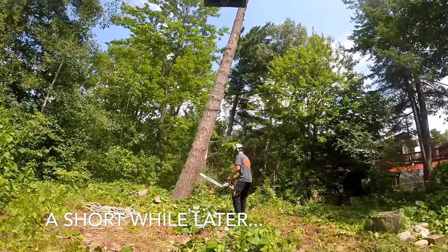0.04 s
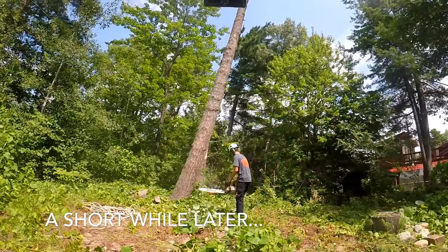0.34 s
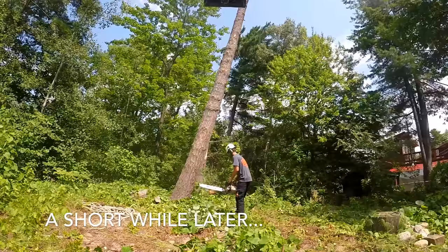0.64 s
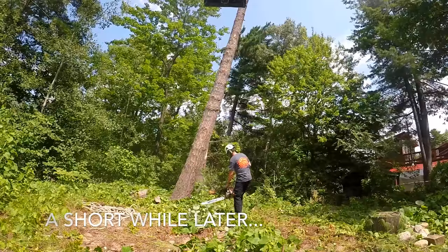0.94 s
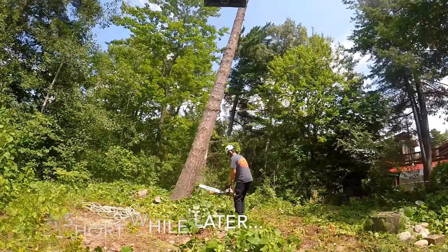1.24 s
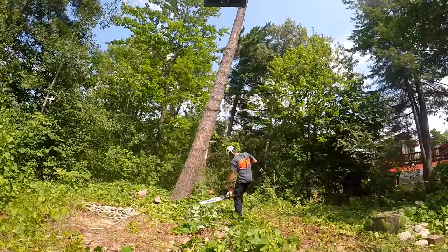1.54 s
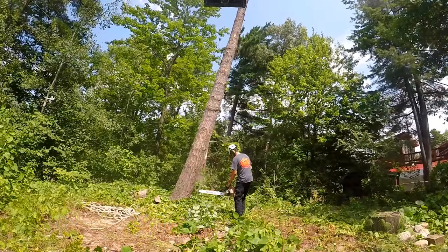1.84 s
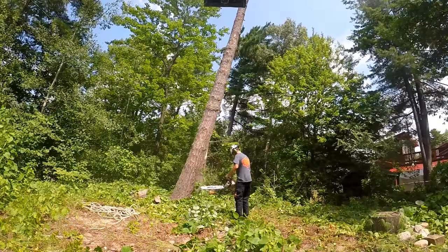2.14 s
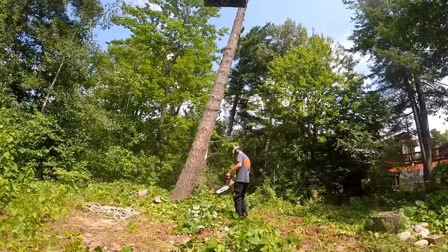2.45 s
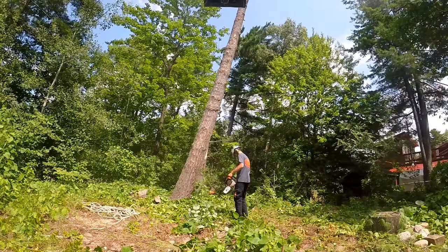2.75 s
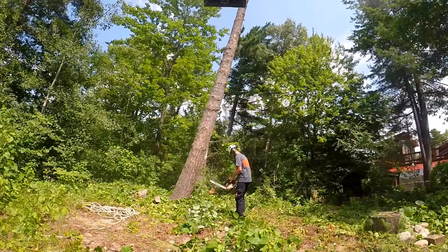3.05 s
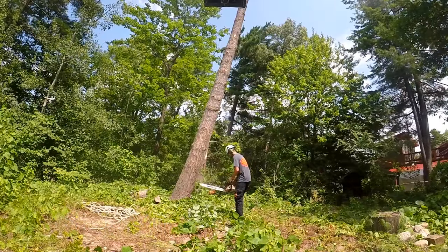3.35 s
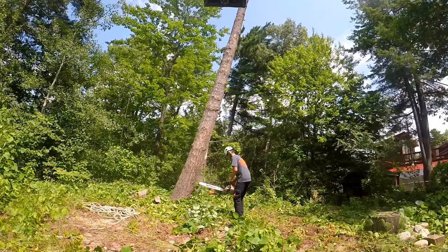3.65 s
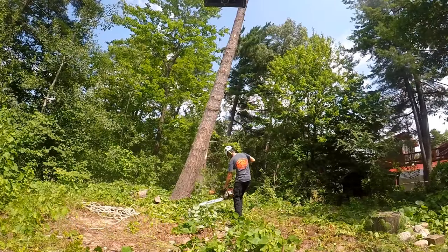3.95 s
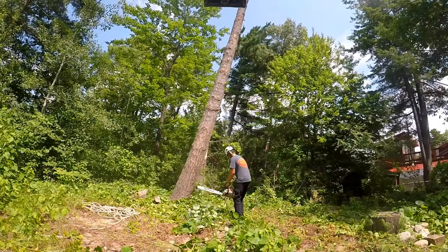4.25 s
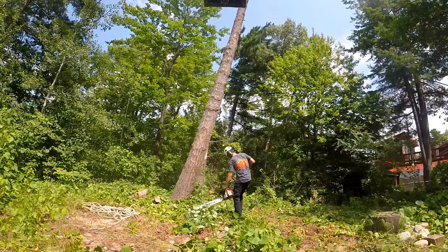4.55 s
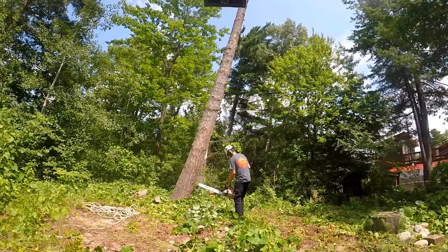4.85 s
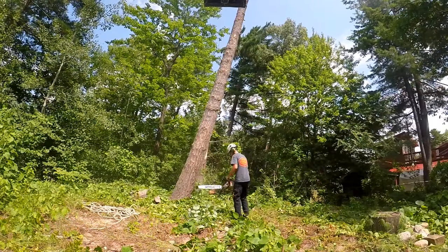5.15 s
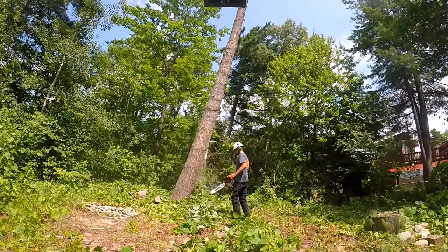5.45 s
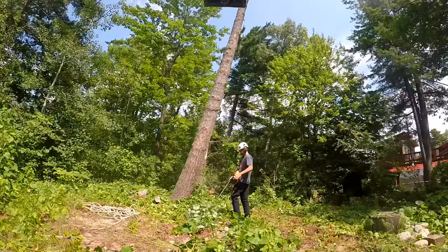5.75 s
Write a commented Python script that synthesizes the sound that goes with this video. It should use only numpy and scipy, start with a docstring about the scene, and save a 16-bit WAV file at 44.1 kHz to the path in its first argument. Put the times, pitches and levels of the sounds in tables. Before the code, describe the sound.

Several rattling pulls on a chainsaw's starter rope before the two-stroke engine catches, sputters and idles unevenly.

```python
"""Pull-starting a chainsaw

A two-stroke saw gets a faint first turn-over, then three pulls that coast to a stop; a last tug catches.
The starter clacks and ticks, the casing rattles and rings, and every turn of the crank puffs through
the muffler. After a few coughs the rich idle fires on about every third turn. Two closely spaced
microphone ports hear it over a quiet outdoor hush with a faint insect trill."""
import sys
import numpy as np
from scipy.fft import rfft, irfft, next_fast_len
from scipy.io import wavfile
from scipy.ndimage import uniform_filter1d

SR = 44100
rng = np.random.default_rng(int(sys.argv[2]) if len(sys.argv) > 2 else 0)


def unload_audio(sound):
    """Save the sound as a 16-bit wav file, at the path given as the first command line argument."""
    columns = np.transpose(np.atleast_2d(sound))
    # keep every value between -1 and 1, then stretch to whole-number steps
    steps = np.round(np.clip(columns, -1, 1) * 32767)
    wavfile.write(sys.argv[1], SR, steps.astype(np.int16))


N = 264600
TIME = np.arange(N) / SR
FFT_SIZE = next_fast_len(N + SR // 2, True)
FREQS = np.maximum(np.fft.rfftfreq(FFT_SIZE, 1 / SR), 1)


def from_db(db):
    """Decibels to gain."""
    return 10 ** (np.asarray(db) / 20)


def rms_one(x):
    """Scale to unit power."""
    return x / np.sqrt(np.mean(np.abs(x) ** 2) + 1e-20)


def over_hz(points):
    """Join (Hz, value) points on a log-frequency axis."""
    hz, value = np.transpose(points)
    return np.interp(np.log(FREQS), np.log(np.sort(hz)), value)


def resonances(modes, plain_db):
    """Gain of a body: resonant peaks standing on a plain, unresonant share."""
    peaks = sum(from_db(db) ** 2 / (1 + ((FREQS - hz) / (width / 2)) ** 2) for hz, width, db in modes)
    return np.sqrt(peaks + from_db(plain_db) ** 2)


def through(x, response):
    """Apply a frequency response."""
    return irfft(rfft(x, FFT_SIZE) * response, FFT_SIZE)[..., :N]


def colour(x, eq, body=1):
    """Minimum-phase EQ of unit power gain: it rings only after it is struck."""
    gain = rms_one(from_db(over_hz(eq)) * body)
    cepstrum = irfft(np.log(gain + 1e-6), FFT_SIZE)
    cepstrum[1:FFT_SIZE // 2] *= 2
    cepstrum[FFT_SIZE // 2 + 1:] = 0
    return through(x, np.exp(rfft(cepstrum)))


def puffs(times, levels_db, puff_s=.015):
    """Pressure impulses, each with the energy of its level held for one puff length."""
    out = np.zeros(N)
    inside = (times >= 0) & (times < (N - 1) / SR)
    out[(times[inside] * SR).astype(int)] = (from_db(levels_db) * np.sqrt(puff_s * SR))[inside]
    return out


def bursts(times, levels_db, rise_ms):
    """Noise bursts that swell, then die a few times slower; a direct row and a scattered row."""
    power, age_ms = np.zeros(N), np.arange(SR // 10) / SR * 1000
    for s, db, rise in zip(times, levels_db, np.broadcast_to(rise_ms, len(times))):
        start = int(np.clip(s * SR, 0, N))
        rises = age_ms / max(rise, .3)
        envelope = from_db(db) * rises * np.exp(1 - rises)
        power[start:start + len(envelope)] += envelope[:N - start] ** 2
    return np.sqrt(power) * rng.standard_normal((2, N))


def uneven(times, spread):
    """A chance offset for every event."""
    return spread * rng.standard_normal(len(times))


# Tone of the outdoor bed. Each row: frequency in Hz, relative level in dB.
HUSH_EQ = [(76, -55), (130, -4.5), (153, -1.5), (206, -6), (242, -7), (383, -13.5), (571, -15.5),
           (619, -17), (1820, -21), (2360, -23), (3820, -24), (4480, -21), (10200, -28.5), (13700, -45.5),
           (15500, -40)]
# Stereo width of the bed. Each row: frequency in Hz, side over mid in dB.
HUSH_WIDTH = [(60, -4), (110, -1), (200, -1.5), (380, 4.5), (700, 9), (1290, 6.5), (2380, 0.5), (4400, -8),
              (8120, 4), (15000, -4)]


def outdoors(hush_db=-50.5, trill_db=-60.5, trill_hz=3775, low_cut_hz=144.7, rumble_db=-80.5):
    """An even hush with only a trace of deep rumble, and a thin insect trill."""
    low_cut = 1 / np.sqrt(1 + (low_cut_hz / FREQS) ** 20)
    hush = from_db(hush_db) * rms_one(from_db(over_hz(HUSH_EQ)) * low_cut)
    trill = from_db(trill_db) * rms_one(1 / (1 + ((FREQS - trill_hz) / 170) ** 2))
    rumble = from_db(rumble_db) * rms_one(1 / (1 + (FREQS / low_cut_hz) ** 2))
    mid, side = through(rng.standard_normal((2, N)), np.sqrt(hush ** 2 + trill ** 2 + rumble ** 2))
    side = through(side, from_db(over_hz(HUSH_WIDTH)))
    return np.array([mid + side, mid - side])


def pull_turns(pull):
    """The rope drives the first turns, then the crank coasts down; returns times and turns/s."""
    start, turns, driven, first, let_go, loss = pull[:6]
    turn = np.arange(turns)
    coasting = (1 - loss) ** np.maximum(turn - driven, 0)
    speed = np.interp(turn, [0, driven], [first, let_go]) * coasting
    return start + np.cumsum(1 / speed) - 1 / speed, speed


def grip_db(pull, t, rope_lead_s=.017):
    """A pull builds in strength as the rope tightens, from just before the first puff."""
    start, take_up_s, level_db = pull[0], pull[6], pull[7]
    return level_db + 20 * np.log10(np.clip((t - start + rope_lead_s) / take_up_s, 1e-6, 1))


# Pulls on the rope. Each row: start in seconds, turns in all, turns driven by the rope, first and
# let-go speeds in turns/s, share of speed lost per coasting turn, take-up in seconds, trim in dB.
PULLS = [(.002, 2, 1, 16, 14, .2, 0.023, -12), (.956, 3, 1, 20.9, 18.3, 0.28, 0.0042, 2.5),
         (1.518, 21, 14, 42, 25, .18, 0.073, 0), (3.832, 12, 4, 38.69, 31.61, .167, 0.11, 0.5),
         (4.495, 4, 3, 27.8, 29.6, 0.023, 0.018, 0.5)]
# EQs for the air thump, the unfired muffler and the rattle. Each row: frequency in Hz, gain in dB.
PUFF_EQ = [(60, -66.5), (105, -37), (125, -13.5), (145, -5.5), (180, 0), (222, 5), (260, -5.5), (320, -4.5),
           (400, -5.5), (600, -28.5), (1200, -63)]
MUFFLER_EQ = [(250, -22.5), (400, 14.5), (540, -24), (600, -7), (650, 11.5), (760, 6.5), (860, -15),
              (1000, -4), (1200, -1), (1310, -10), (1450, -1), (1800, -27), (3000, -29)]
RATTLE_EQ = [(290, -58.5), (500, -0.5), (657, -4.5), (968, -1.5), (1180, -2.5), (1310, -33.5), (1850, -6.5),
             (3330, -6.5), (3580, -7.5), (4020, -6), (6180, -2.5), (6830, -1), (8120, -11), (12700, -26),
             (15500, -33)]
# Ring of the casing. Each row: frequency in Hz, width in Hz, peak gain in dB.
CASING_MODES = [(724, 56, -4), (1195, 11, -2), (1457, 45, 13.5), (1823, 110, 1), (2340, 210, -3),
                (2801, 78, 0.5), (3127, 93, -3.5), (3560, 76, 1), (5050, 85, -7.5), (6680, 52, -4.5),
                (7200, 31, -2.5), (8600, 100, -26)]


def cranking(puff_db=-30, intake_db=-8.5, muffler_db=-35.5, rattle_db=-29, rebound_db=-33):
    """Each unfired turn puffs, gulps air and shakes the casing; the slowest clink against compression."""
    brisk_speed, rebound_speed = 22.66, 13  # turns/s
    rows = []
    for pull in PULLS:
        times, speeds = pull_turns(pull)
        rows.append([times, speeds, grip_db(pull, times)])
    s, speed, grip = np.hstack(rows)
    s = s + (speed > brisk_speed) * uneven(s, .0022)
    force = -13.5 * np.maximum(np.log2(brisk_speed / speed), 0)  # dB, lower with each halving of speed
    puff = force + grip / 2 + uneven(s, .3)
    rattle = force + grip + uneven(s, 2)
    intake_s = s + np.minimum(.42 / speed, .0135)

    def ports_open(db):
        """The exhaust impulse, then the weaker intake impulse."""
        return puffs(s, db) + puffs(intake_s, db + intake_db + uneven(s, 4))

    thump = colour(ports_open(puff + puff_db), PUFF_EQ)
    ring = colour(ports_open((puff + rattle) / 2 + muffler_db), MUFFLER_EQ)
    jolts = bursts(s - .0052, rattle + rattle_db, rise_ms=8.7)
    shake = colour(jolts, RATTLE_EQ, resonances(CASING_MODES, plain_db=-18))
    slow_s = s[speed < rebound_speed]
    rebounds = bursts(slow_s - .00855, rebound_db + uneven(slow_s, .5), rise_ms=3.4)
    rebound_eq = [(120, -70), (400, -6), (900, 4.5), (1400, -20), (2000, 3), (2800, 7.5), (3600, -13),
                  (7000, -12), (12000, -35)]
    clink = colour(rebounds, rebound_eq, resonances(CASING_MODES, plain_db=-8))
    return thump + ring + shake + clink


def pull_motion(level_db=-26, at_turns_per_s=34.6, db_per_doubling=18.5):
    """Envelope of the rubbing during the pulls: it follows the speed of the crank."""
    level = np.zeros(N)
    for pull in PULLS:
        s, speed = pull_turns(pull)
        doublings = np.log2(np.interp(TIME, s, speed) / at_turns_per_s)
        turning = TIME < s[-1] + 1 / speed[-1]
        level += from_db(level_db + db_per_doubling * doublings + grip_db(pull, TIME)) * turning
    return level


def chatter(spread_db, hold_ms):
    """Gain that jumps about every few milliseconds; unit power."""
    wander = rms_one(uniform_filter1d(rng.standard_normal(N), size=int(hold_ms * SR / 1000)))
    return rms_one(from_db(spread_db * np.clip(wander, -2, 2)))


def whirr(catch_db=-27, flare_db=-24, idle_db=-30):
    """Rope, flywheel and chain rub and ring the casing; this flares as the engine catches, then eases."""
    engine_db = np.interp(TIME - CATCH_S, [0, .23, 1.21], [catch_db, flare_db, idle_db])
    level = pull_motion() + RUNNING * from_db(engine_db)
    rubbing = level * chatter(spread_db=4, hold_ms=4) * rng.standard_normal((2, N))
    return colour(rubbing, RATTLE_EQ, resonances(CASING_MODES, plain_db=-14.5))


def ratchet(ticks_per_s=80):
    """The starter pawls and the chain tick at random while the pulls spin the crank."""
    at = np.nonzero(rng.random(N) < ticks_per_s / SR)[0]
    db = 20 * np.log10(pull_motion() + 1e-9) + rng.uniform(-4, 4, N)
    tick_eq = [(200, -55), (900, -27), (2000, -1.5), (4000, 0), (7200, -1), (8500, -11), (14000, -26)]
    return colour(bursts(at / SR, db[at], rise_ms=.99), tick_eq)


def housing_ring(pull_db=-11, catch_db=-33, idle_db=-47, ring_hz=1195.4, half_width_hz=12):
    """One lightly damped mode sings through the pulls and first coughs, then recedes in the idle."""
    engine_db = np.interp(TIME - CATCH_S, [.44, .82], [catch_db, idle_db])
    level = from_db(pull_db) * pull_motion() + RUNNING * from_db(engine_db)
    mode = rms_one(1 / (1 + ((FREQS - ring_hz) / half_width_hz) ** 2))
    return level * through(rng.standard_normal(N), mode)


# Handling clicks. Each row: start in seconds, level in dB.
CLICKS = [(0.438, -39), (2.782, -40.5)]
# Their crisp tone. Each row: frequency in Hz, gain in dB.
CLICK_EQ = [(200, -55), (1200, -22), (3000, -1.5), (5000, -3), (6800, 5.5), (8500, -6), (12000, -15),
            (15000, -12)]


def handling():
    """Light clicks as the saw is handled between the pulls."""
    s, db = np.transpose(CLICKS)
    return colour(bursts(s, db, rise_ms=6.7), CLICK_EQ)


# Hits of the starter pawls and loose metal. Each row: start in seconds, knock, clink and tick levels
# in dB before each layer's trim, rise of the clink in ms, delay of the knock in ms.
CLACKS = [(0.835, -32, -37, -33, 3, 0), (.846, -13.5, -27, -25, 2.2, -1),
          (1.098, -34.5, -53, -36, 3.4, 11.5), (1.379, -36.5, -32, -46, 3.1, -3),
          (1.419, -20, -30.5, -28.5, 3.2, 4.5), (1.506, -26, -25.5, -28, 1.9, 4.5),
          (1.538, -49, -18.5, -19.5, 2.6, 0), (1.555, -44, -30, -26.5, 3.1, 0),
          (1.573, -33, -21, -22, 2.8, -11), (1.774, -25, -20.5, -17, 2.2, 1),
          (1.925, -16.5, -22, -18.5, 1.85, 0.5), (2.021, -53, -46, -30.5, 1.4, -3),
          (2.112, -26, -28.5, -35.5, 3.8, -3.5), (3.785, -23.5, -19, -30, 3.65, 0.5),
          (4.402, -23, -35.5, -28.5, 3.7, 7.5), (4.98, -12.5, -38, -27, 1.6, 3.5)]
# Three EQs: knock, clink, tick. Each point: frequency in Hz, gain in dB.
CLACK_EQS = [
    [(200, -64), (480, -16), (680, 1), (1000, 6), (1250, -3.5), (1500, -1.5), (2400, -9.5), (5000, -50)],
    [(600, -63), (1300, -20), (1800, -4.5), (2600, 2.5), (3200, -2), (4500, -19), (9000, -87)],
    [(1500, -99), (3200, -8.5), (4500, 5), (6200, 0.5), (7100, 10), (8200, -10.5), (11000, -14),
     (15000, -30)],
]


def clacks(bounce_s=.0377):
    """Metal parts meet: a dry knock as they seat, a casing clink with a faint bounce, a tick on top."""
    s, knock_db, clink_db, tick_db, rise_ms, delay_ms = np.transpose(CLACKS)
    knock_eq, clink_eq, tick_eq = CLACK_EQS
    knock = colour(bursts(s + delay_ms / 1000, knock_db - 4, rise_ms * 1.84), knock_eq)
    strike = bursts(s, clink_db - 1, rise_ms)
    bounce = bursts(s + bounce_s, knock_db - 23, rise_ms)
    clink = colour(strike + bounce, clink_eq, resonances(CASING_MODES, plain_db=-36))
    tick = colour(bursts(s, tick_db + 1.5, rise_ms * 1.64), tick_eq)
    return knock + clink + tick


# Uneven firings as the engine catches and when it stumbles.
# Each row: start in seconds, bang level in dB, most turns until the next firing.
COUGHS = [(4.636, -14.5, 6), (4.759, -14.5, 4), (4.834, -15.5, 4), (4.902, -13.5, 3), (4.951, -13, 3),
          (5.001, -13.5, 3), (5.952, -15.5, 2), (5.979, -15, 3)]
CATCH_S = COUGHS[0][0]
RUNNING = TIME >= CATCH_S
IDLE_TURNS_PER_S, TURNS_PER_FIRING = 62.98, 3
SETTLE_START_S, SETTLE_S = 4.93, .49


def firings(idle_start_s=5.051, idle_count=20, idle_db=-13.5):
    """The coughs and the even, slowly quickening idle; returns times, dB and turns until the next."""
    speed = IDLE_TURNS_PER_S + .284 * np.arange(idle_count)
    gaps = TURNS_PER_FIRING / speed
    even = [(s, idle_db, TURNS_PER_FIRING) for s in idle_start_s + np.cumsum(gaps) - gaps]
    return np.transpose(sorted(even + [tuple(row) for row in COUGHS]))


def settled(t):
    """0 while the engine is catching, 1 once it has settled."""
    return np.clip((t - SETTLE_START_S) / SETTLE_S, 0, 1)


def boom_db_at(t, faded_in_db=-41.5, growth_db_per_s=5.5):
    """The idle's low boom fades in and grows, as if the microphone's low cut lifts."""
    fade_db = 20 * np.log10(settled(t) + 1e-3)
    return faded_in_db + fade_db + growth_db_per_s * (t - SETTLE_START_S - SETTLE_S)


# EQs for the low thud and the crack of a firing. Each row: frequency in Hz, gain in dB.
THUD_EQ = [(15, -8), (45, 2), (66, 3), (95, 5), (130, -4), (200, -1), (400, -49.5)]
CRACK_EQ = [(590, -33), (1000, -9), (1170, 6.5), (1290, -9), (1620, -5), (1940, 4.5), (2710, -4), (3330, 2),
            (4290, 4.5), (6190, -3), (7440, -3.5), (12800, -14), (15500, -54)]
# Ring of the hot muffler shell. Each row: frequency in Hz, width in Hz, peak gain in dB.
MUFFLER_MODES = [(1216, 42, -7.5), (1470, 170, -8), (1880, 150, -2.5), (2438, 55, 3.5), (2670, 160, 7.5),
                 (3195, 61, 1), (3640, 120, -8.5), (4390, 115, -2), (4700, 42, -1.5), (5260, 530, -5),
                 (5590, 45, -3), (5500, 26, 6), (6990, 260, 2.5), (7500, 130, 1.5), (8630, 66, -1)]


def bangs(thud_db=4, crack_db=-2, jet_db=-9):
    """A firing thuds and cracks against the muffler shell, then a brighter jet of gas follows."""
    s, db, _ = firings()
    db = db + uneven(s, .5)
    brightness_db = uneven(s, 1.5)
    thud = colour(puffs(s - .001, boom_db_at(s) + thud_db), THUD_EQ)
    blast = bursts(s - .0021, db + crack_db - brightness_db / 2, rise_ms=3.2)
    crack = colour(blast, CRACK_EQ, resonances(MUFFLER_MODES, plain_db=-17.5))
    jet_eq = [(1500, -43), (3000, -.5), (4500, 2), (7300, 2.5), (9000, -.5), (11500, -13), (15000, -21.5)]
    jet = colour(bursts(s + .0011, db + jet_db + brightness_db, rise_ms=4.1), jet_eq)
    return thud + crack + jet


def crank_turns():
    """Times of the running turns: a whole number between two firings, fewer if one comes early."""
    fired, _, most_turns = firings()
    gaps = np.append(np.diff(fired), TURNS_PER_FIRING / IDLE_TURNS_PER_S)
    turns = np.round(np.minimum(most_turns, gaps * IDLE_TURNS_PER_S))
    turns = np.maximum(turns, 1).astype(int)
    return np.concatenate([s + gap * np.arange(n) / n for s, gap, n in zip(fired, gaps, turns)])


# Voice of the muffler with the engine running. Each row: frequency in Hz, gain in dB.
EXHAUST_EQ = [(180, -34), (300, -5), (371, -41), (442, 2), (516, -5.5), (568, -5), (606, -6.5), (638, 1),
              (721, 7.5), (831, -7), (1030, -16), (1180, -23), (1240, -30), (1290, -43), (1400, -8.5),
              (1820, -67), (3080, -120)]


def idle(puff_db=-37.5, rush_db=-35.5, exhaust_db=-31.5, slap_db=-31, port_jitter_s=.00025):
    """Over a low drone, every turn brings a puff, a gulp, a gas rush, a muffler ring, a piston slap."""
    s = crank_turns()
    angle = 2 * np.pi * np.interp(TIME, s, np.arange(len(s)))
    harmonics = np.cos(angle) + from_db(-9) * np.cos(2 * angle)
    drone = np.sqrt(2) * RUNNING * from_db(boom_db_at(TIME) + 1.5) * harmonics
    accent_db = uneven(s, .8)
    # the intake is half impulse, half turbulence, and rings in the same air box as the puff
    gulp_s, gulp_db = s + .00837, -32 - 21 * settled(s)
    gulp = (puffs(gulp_s, gulp_db) + bursts(gulp_s, gulp_db, rise_ms=5.7)) / np.sqrt(2)
    thump = colour(puffs(s - .001, puff_db + accent_db) + gulp, PUFF_EQ)
    rush = gas_rush(s, rush_db + accent_db)
    # the gas never leaves at quite the same moment of the turn
    ring = colour(puffs(s + uneven(s, port_jitter_s), exhaust_db + accent_db), EXHAUST_EQ)
    piston = bursts(s - .003, slap_db + uneven(s, 3.5), rise_ms=6.3)
    slap = colour(piston, CRACK_EQ, resonances(MUFFLER_MODES, plain_db=-8))
    return drone + thump + rush + ring + slap


# Dull breath of the escaping gas. Each row: frequency in Hz, gain in dB.
RUSH_EQ = [(90, -27), (160, -0.5), (300, -4), (480, 0), (620, -9), (1000, -21), (1500, -38)]


def gas_rush(times, levels_db):
    """A short rush of gas each time the exhaust port opens."""
    return colour(bursts(times, levels_db, rise_ms=4.2), RUSH_EQ)


# Width from the pressure gradient, a quarter cycle out of step.
# Each row: frequency in Hz, signed ratio of side to mid.
GRADIENT_SIDE = [(200, -.08), (500, .25), (680, .1), (850, .8), (1050, 1.1), (1200, 2.8), (1270, 3.2),
                 (1330, -2.8), (1500, -1.7), (1900, -.8), (2400, -.05), (5200, .15), (6600, .1),
                 (7800, -.8), (10000, -.05)]
# Width from nearby reflections. Each row: frequency in Hz, side over mid in dB.
SCATTER_SIDE = [(100, -14), (300, -21), (700, -13.5), (1400, -1), (2200, -4.5), (4000, -14), (6000, -2),
                (14000, -0.5)]
# Stereo balance. Each row: frequency in Hz, left over right in dB.
BALANCE = [(60, -4), (110, 0.5), (200, -0.5), (380, 4), (700, -0.5), (1290, -0.5), (2380, 1.0), (4400, -1),
           (8120, -1.0), (15000, -4)]


def microphone_ports(saw, near_t60_s=.027, trees_db=-13, trees_low_hz=850, trees_t60_s=.36):
    """The two ports differ by pressure gradient and scattered sound; trees add a faint, thin tail."""
    mid, scattered = saw
    gradient = through(mid, 1j * over_hz(GRADIENT_SIDE))
    side = gradient + through(scattered, from_db(over_hz(SCATTER_SIDE)) * echoes(near_t60_s))
    thin = from_db(trees_db) / np.sqrt(1 + (trees_low_hz / FREQS) ** 4)
    tail = through(mid, thin * np.array([echoes(trees_t60_s), echoes(trees_t60_s)]))
    pair = np.array([mid + side, mid - side]) + tail
    return through(pair, from_db(over_hz(BALANCE) / 2 * np.array([[1], [-1]])))


def echoes(t60_s):
    """Response of many small reflections that die away; unit power gain."""
    age = TIME[:SR // 2]
    return rms_one(rfft(rng.standard_normal(len(age)) * from_db(-60 * age / t60_s), FFT_SIZE))


def scene():
    """The saw in front of the microphone, in the open air."""
    saw = cranking() + whirr() + ratchet() + clacks() + handling() + housing_ring() + idle() + bangs()
    return microphone_ports(saw) + outdoors()


def record(dry, ceiling=.9, cutoff_hz=15350):
    """The tallest peaks are rounded and the top is cut."""
    rounded = ceiling * np.tanh(dry / ceiling)
    return through(rounded, 1 / np.sqrt(1 + (FREQS / cutoff_hz) ** 160))


dry = scene()
out = record(dry)
unload_audio(out)
```